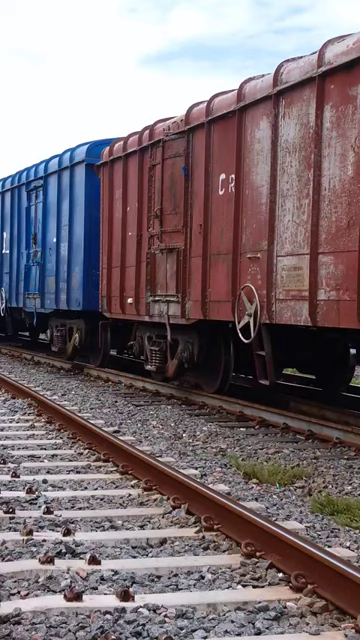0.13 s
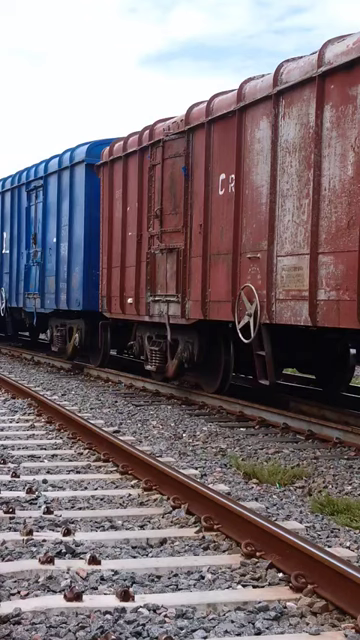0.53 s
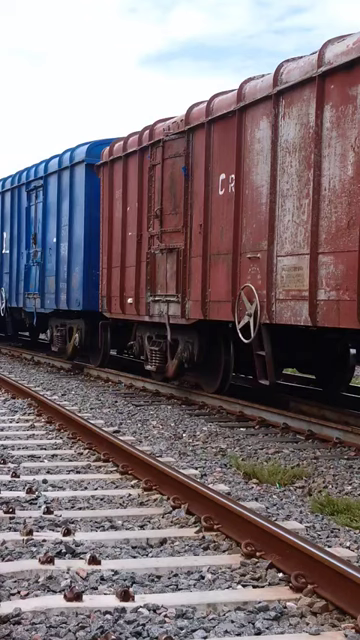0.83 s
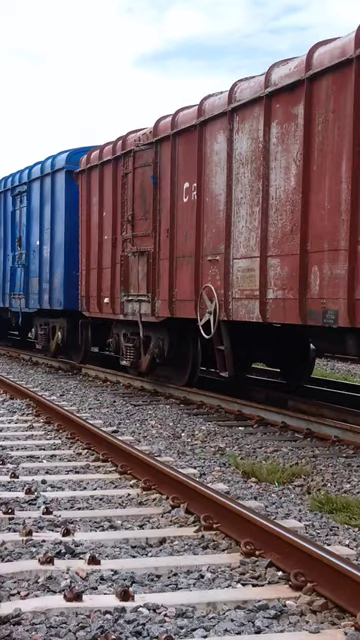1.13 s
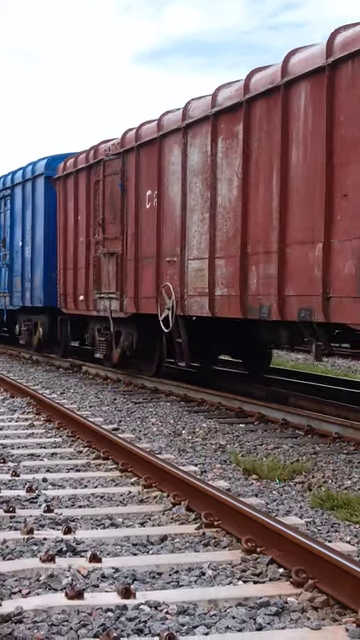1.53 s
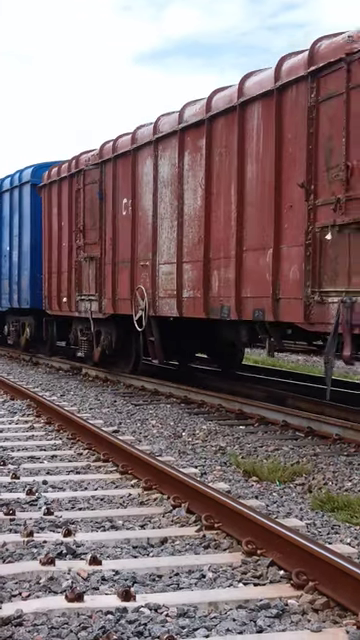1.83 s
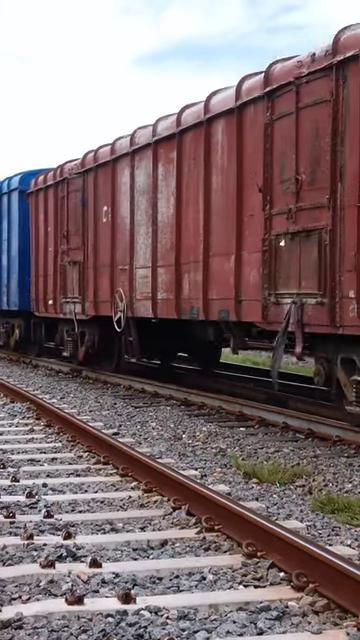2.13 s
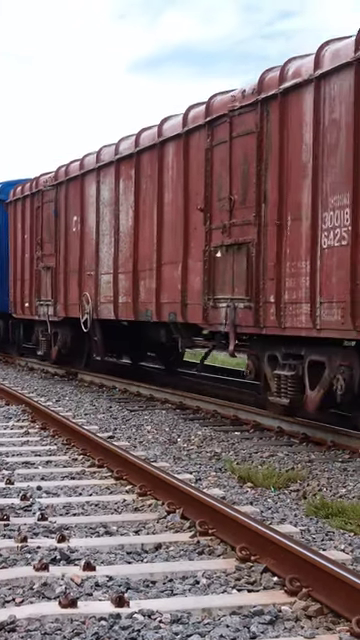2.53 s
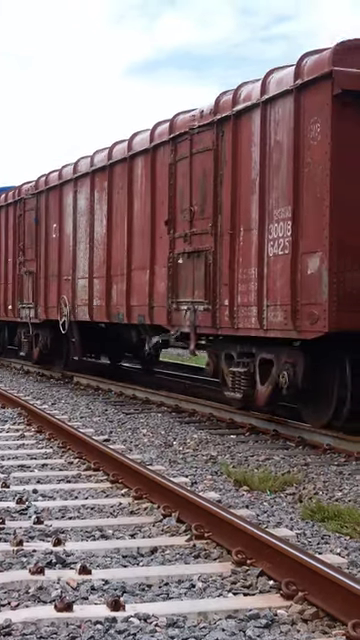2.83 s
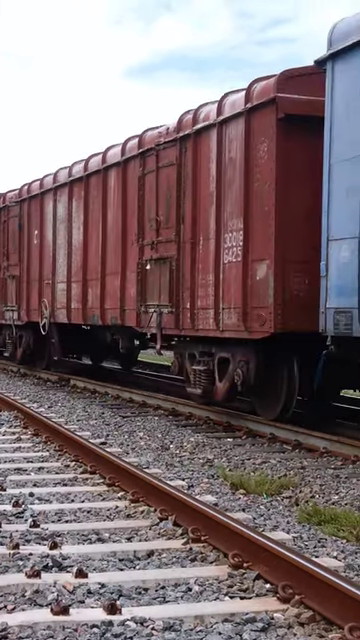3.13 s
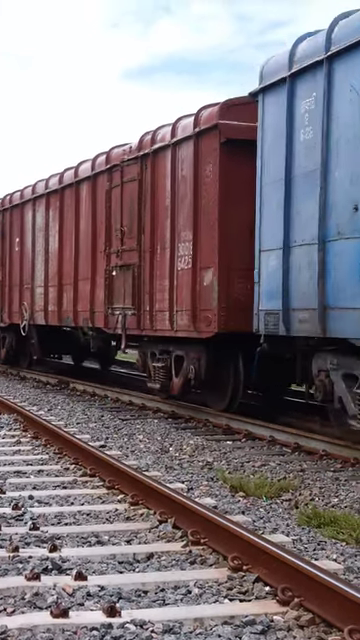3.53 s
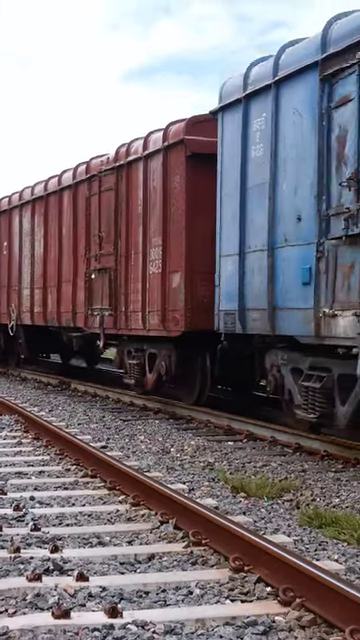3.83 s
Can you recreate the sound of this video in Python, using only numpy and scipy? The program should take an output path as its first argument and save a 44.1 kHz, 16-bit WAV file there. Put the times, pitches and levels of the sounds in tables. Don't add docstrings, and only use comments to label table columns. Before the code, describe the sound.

Slow goods wagons rumble by close at hand, clacking over rail joints, scraping and faintly squeaking

```python
import sys
import numpy as np
from scipy import signal
from scipy.fft import rfft, irfft
from scipy.io import wavfile
from scipy.ndimage import uniform_filter1d

SR = 44100
rng = np.random.default_rng(int(sys.argv[2]) if len(sys.argv) > 2 else 0)


def gain_from_db(level_db):
    decades = np.asarray(level_db, float) / 20
    return 10 ** decades


def inscribe(sig):
    pcm = np.round(np.clip(np.atleast_2d(sig).T, -1, 1) * 32767)
    wavfile.write(sys.argv[1], SR, pcm.astype(np.int16))


N = 176400

# time in seconds, rumble in dB, rail drone in dB, flange scrape in dB.
ROLL = [
    (0.32, -38.5, -46.5, -44),
    (0.68, -28, -38.5, -42),
    (1.85, -27.5, -35, -48),
    (2.21, -29, -37, -42),
    (2.52, -33.5, -38, -46.5),
    (2.89, -31, -38, -46.5),
    (3.44, -33.5, -33, -44.5),
    (4.0, -27, -33, -42),
]
# frequency in Hz, level in dB per Hz.
RUMBLE = [(13, -45), (22, -26), (36, -2), (59, 3.5), (200, -15), (249, -14), (480, -18.5), (620, -40),
          (1060, -120)]
DRONE = [(190, 1.5), (330, 2), (456, -1.5), (614, -7), (754, -3.5), (1010, -17), (1600, -22.5), (2080, -64),
         (3520, -120)]
SCRAPE = [(530, 2), (900, 1.5), (1190, -5), (2020, -9), (2290, -9), (3640, -13), (4370, -13), (5300, -16.5),
          (9000, -33), (11700, -63), (19800, -120)]
HISS = [(5410, -39), (9200, -4.5), (9640, 1), (10500, 1.5), (13500, -2), (15200, 4)]
# depth of slow patches in dB, depth of quick flicker in dB.
GRAIN_DB = [(1.0, 1.0), (1.5, 1.0), (1.8, .8), (2.5, 1.5), (1.0, .5), (2.0, 2.5)]
# frequency in Hz, width in Hz, level in dB.
WHEEL = [(1700, 160, -3), (2100, 40, -3), (2290, 70, -1), (2530, 90, -3), (3033, 50, -2), (4200, 200, -3),
         (4870, 60, -7), (5300, 200, -6)]
SLEEPER = [(120, 67, -16), (198, 90, 12.5), (278, 180, 14), (364, 97, -4.5), (497, 120, 5), (730, 26, -2),
           (874, 67, -30)]
# frequency in Hz, likeness from 0 to 1.
SAME = [(60, 0.88), (300, 1), (700, 0.86), (1400, 0.53), (3000, 0.047), (7000, 0.023), (14000, 0.078)]
# frequency in Hz, left minus right in dB.
TILT = [(60, 2.5), (300, 2), (1300, 2), (3000, 1.5), (8000, -1.5), (14000, -.5)]
# frequency in Hz, level in dB per Hz.
WIND = [(25, -52), (60, 17.5), (100, -1), (270, -9), (500, -18.5), (1000, -28)]
# middle in seconds, length in seconds, level in dB.
GUSTS = [
    (0.433, 0.032, -48),
    (0.705, 0.13, -23.5),
    (0.934, 0.059, -26.5),
    (1.25, 0.42, -37.5),
    (2.147, 0.083, -21.5),
    (2.702, 0.12, -27.5),
    (2.835, 0.15, -18),
    (2.898, 0.14, -24.5),
    (3.055, 0.083, -12),
    (3.142, 0.098, -28),
]
# time in seconds, peak in dB, pitch in Hz.
PUFFS = [
    (2.796, -8.5, 141),
    (2.821, -6, 93),
    (2.833, -12, 120),
    (2.851, -9, 130),
    (2.881, -14, 108),
    (2.955, -8, 114),
    (3.051, -16, 101),
    (3.071, -17, 120),
    (3.089, -13, 88),
    (3.125, -9.5, 108),
]
# middle in seconds, pitch in Hz, peak in dB.
BUMPS = [(0.238, 79, -38), (0.448, 62.3, -24.5), (0.53, 105, -28), (0.587, 125, -30), (0.589, 56.5, -20),
         (0.659, 103, -25.5), (0.713, 66, -23), (0.765, 134, -26), (0.832, 80, -36), (1.069, 61, -24.5),
         (1.13, 71, -26), (1.397, 84, -27), (1.482, 97, -23), (1.514, 108, -28), (1.54, 59.4, -22),
         (1.702, 136, -29), (1.884, 119, -24.5), (2.094, 52, -23), (2.133, 136, -41), (2.603, 68.6, -20),
         (2.754, 61, -24.5), (3.053, 136, -29), (3.409, 69.4, -20.5), (3.505, 56.4, -25.5),
         (3.651, 128, -24), (3.812, 47, -31)]
# middle in
# seconds, pitch in Hz, peak in dB.
KNOCKS = [(0.19, 530, -39), (0.283, 212, -34), (0.573, 504, -27), (0.586, 134, -34), (0.778, 178, -25),
          (0.94, 617, -26), (1.433, 673, -37), (1.441, 970, -35), (1.468, 630, -35), (1.478, 890, -39),
          (1.523, 520, -33), (1.525, 663, -28.1), (1.535, 255, -21.5), (1.56, 670, -34.8), (1.69, 740, -29),
          (2.119, 730, -28), (2.126, 159, -28.5), (2.19, 513, -32), (2.195, 780, -30), (2.821, 342, -23.5),
          (2.837, 466, -30), (2.85, 135, -36), (3.046, 698, -34.8), (3.071, 223, -17), (3.074, 940, -33),
          (3.622, 760, -25), (3.648, 138, -24), (3.651, 206, -23), (3.685, 670, -31), (3.803, 563, -26.5)]
# middle in seconds, pitch in Hz, peak in dB.
PINGS = [(1.6, 202, -26), (1.77, 422, -30), (2.114, 243, -23.5), (0.928, 2520, -43), (1.432, 3060, -47),
         (1.448, 2970, -53), (1.446, 4340, -36), (1.456, 1780, -36), (1.462, 2200, -33), (1.516, 2330, -32),
         (1.535, 1610, -36), (1.684, 2220, -40), (2.113, 1610, -41), (3.047, 1650, -34.5),
         (3.624, 2200, -41), (3.685, 2440, -37), (3.697, 2860, -45), (3.862, 2440, -32), (3.968, 2360, -37)]
# start in seconds, length in seconds, start pitch in Hz, end pitch in Hz, level in dB.
SQUEAKS = [
    (.25, .09, 700, 700, -43),
    (.33, .06, 700, 722, -42),
    (.375, .095, 703, 698, -38),
]
CREAK = (2.69, .11, 636, 636, -48)
SQUEAK_PARTS_DB = (-2, -5, 0, -24, -14)
CREAK_PARTS_DB = (-2, -1, -14, -12, -1, -5, -20, -12, -3)
CHIRPS = [
    (0.935, 0.07, 2390, 2330, -46),
    (1.095, 0.05, 2350, 2450, -45),
    (1.128, .06, 2450, 2170, -42),
    (1.17, .065, 2200, 2070, -46),
    (3.684, 0.065, 2920, 2860, -45),
    (2.115, 0.05, 2560, 2560, -46),
    (3.51, .11, 4060, 4000, -54),
    (3.5, 0.15, 5380, 5400, -55),
]
# time in seconds, clank in dB, thud in dB, length in seconds, loudest ring in Hz.
CLACKS = [(0.555, -23.5, -49, 0.045, 2300), (0.624, -27, -55, 0.014, 2320),
          (0.929, -26, -21.5, 0.066, 2530), (1.424, -23, -33, 0.059, 3070),
          (1.433, -32.5, -16.5, 0.1, 2760), (1.505, -31, -16, 0.04, 2230), (1.526, -37, -17.5, 0.18, 1630),
          (1.6756, -34, -25.5, 0.056, 2260), (1.997, -28.5, -25, 0.12, 2340),
          (2.109, -28, -16.5, 0.039, 1580), (2.183, -34, -17.5, 0.023, 2190),
          (2.704, -37.5, -25, 0.12, 2080), (3.039, -24.5, -18.5, 0.027, 1550),
          (3.069, -30, -22, 0.03, 1660), (3.088, -27.5, -37, 0.046, 1900), (3.239, -37, -23, 0.042, 1650),
          (3.622, -24.5, -17.5, 0.049, 2100), (3.682, -23, -26, 0.032, 3000),
          (3.8506, -26.5, -20, 0.047, 2470), (3.953, -26.5, -30, 0.04, 2250)]
# multiple of the ring pitch, level in dB per Hz.
CLANK = [(.25, 7), (.5, -3), (1.0, 1.5), (1.6, 0), (2.5, -19), (4.0, -33)]
# middle in seconds, length in seconds, level in dB.
GRINDS = [
    (2.05, 0.16, -45.5),
    (2.3, 0.61, -48.5),
    (3.45, 0.43, -51.5),
]
# frequency in Hz, width in Hz, level in dB.
GRIND = [(4150, 660, 2), (5320, 940, -0.5)]

OPEN_S = 0.1503
TRAIN_LAG_S, CLACK_LAG_S = 0.00037, 0.00013


def evened(x):
    return x / np.sqrt(np.mean(x ** 2) + 1e-20)


def read(points, hz):
    f, value = np.transpose(points)
    return np.interp(np.log(hz + 1), np.log(f + 1), value)


def resonate(x, hz, width):
    turn = np.exp(2j * np.pi * np.cumsum(hz * np.ones(len(x))) / SR)
    r = np.exp(-np.pi * width / SR)
    smooth = signal.lfilter([1 - r], [1, -r], x / turn + 1e-18)
    return 2 * (turn * smooth).real


def noise(shape, patchy_db, flicker_db, size):
    frames = 4 * N // size + 5
    hz = np.fft.rfftfreq(size, 1 / SR)
    a, b, c, d, patches = rng.standard_normal((frames, len(hz), 5)).T
    patches = uniform_filter1d(patches, size=size // 100, axis=0)
    patches = evened(uniform_filter1d(patches, size=8192 // size, axis=1))
    flicker = evened(uniform_filter1d(rng.standard_normal(frames), size=3))
    inside = (hz > shape[0][0] / 1.3) & (hz < shape[-1][0] * 1.02)
    colour = (read(shape, hz) - 80 * ~inside)[:, None]
    z = np.array([a + 1j * b, c + 1j * d]) * gain_from_db(colour + patchy_db * patches + flicker_db * flicker)
    return evened(signal.istft(z, nperseg=size, noverlap=size - size // 4)[1][:, :N])


def ring(modes, pair):
    hz = np.fft.rfftfreq(pair.shape[1], 1 / SR)
    power = 0
    for f, w, d in modes:
        near = 1 + (2 * (hz - f) / w) ** 2
        far = 1 + (2 * (hz - f) / (3 * w)) ** 2
        power = power + gain_from_db(2 * d) / w / near / far
    return evened(irfft(rfft(pair) * np.sqrt(power), pair.shape[1]))


def swells(rows):
    t = np.arange(N) / SR
    return sum(gain_from_db(db) * np.exp(-(2 * (t - s) / length) ** 2) for s, length, db in rows)


def bursts(rows, seconds):
    out, t = np.zeros(N + SR), np.arange(-4410, 4410) / SR
    for s, hz, db in rows:
        lead = 28 / hz ** 2
        bell = np.exp(-(2 * t / seconds(hz)) ** 2)
        start = round((s - lead) * SR) - 4410
        out[start:][:len(t)] += gain_from_db(db) * bell * np.cos(2 * np.pi * hz * (t - 2 * lead))
    return out[:N]


def ports(pair, lag_s):
    hz, (a, b) = np.fft.rfftfreq(N, 1 / SR), rfft(pair)
    same = np.clip(read(SAME, hz), 0, 1)
    left = (same * a + np.sqrt(1 - same ** 2) * b) * np.exp(-2j * np.pi * hz * lag_s)
    half_tilt = read(TILT, hz) / 2
    return irfft(np.array([left * gain_from_db(half_tilt), a * gain_from_db(-half_tilt)]), N)


def rolling():
    s, *levels = np.transpose(ROLL)
    t = np.arange(N) / SR
    rumble, drone, scrape = (np.interp(t, s, v) for v in levels)
    hiss = gain_from_db(-61.5 + 4.5 + 0.7 * (scrape - scrape.mean()))
    hiss = hiss * (1 - np.exp((OPEN_S - t) / 0.046))
    out = gain_from_db(rumble + 2.56) * noise(RUMBLE, *GRAIN_DB[0], size=2048)
    out += gain_from_db(drone + 2.0) * noise(DRONE, *GRAIN_DB[1], size=1024)
    out += gain_from_db(scrape + 7.5) * noise(SCRAPE, *GRAIN_DB[2], size=512)
    out += gain_from_db(scrape - 8) * ring(WHEEL, noise(SCRAPE, *GRAIN_DB[3], size=1024))
    return out + hiss * noise(HISS, *GRAIN_DB[4], size=512)


def wind():
    breeze = gain_from_db(-34.5) * np.clip(np.arange(N) / SR / 1.15, 0, 1)
    air = noise(WIND, *GRAIN_DB[5], size=1024)
    steady = air / np.sqrt(uniform_filter1d(air ** 2, size=3000, axis=1) + 0.05)
    puffs = bursts([(s, hz, db) for s, db, hz in PUFFS], lambda hz: 1.6 / hz)
    left = swells(GUSTS) * steady[0] + puffs + breeze * air[0]
    return np.array([left, 0.38 * breeze * air[1]])


def knocks(rows):
    one = gain_from_db(2) * bursts(rows, lambda hz: 0.17 / hz ** 0.37)
    return np.array([one, 0.5 * one])


def squeaks():
    out = np.zeros(N)
    families = [(SQUEAKS, SQUEAK_PARTS_DB), ([CREAK], CREAK_PARTS_DB), (CHIRPS, None)]
    for rows, parts_db in families:
        for s, length, hz0, hz1, db in rows:
            n = round(length * SR)
            hz, fuzz = np.linspace(hz0, hz1, n), rng.standard_normal(n)
            waver = 1 + 0.003 * evened(uniform_filter1d(fuzz, size=600))
            turns = np.cumsum(hz * waver) / SR
            if parts_db is None:
                breath = resonate(resonate(fuzz, hz, 60), hz, 180)
                tone = np.sin(2 * np.pi * turns) + 0.6 * evened(breath)
            else:
                tone = sum(gain_from_db(d) * np.sin(2 * np.pi * (k + 1) * turns) for k, d in enumerate(parts_db))
            out[round(s * SR):][:n] += gain_from_db(db) * np.sqrt(np.hanning(n)) * tone
    return np.array([np.roll(out, round(CLACK_LAG_S * SR)), out])


def blow(db, length):
    t = np.arange(SR // 4) / SR
    rise = np.minimum(t / 0.0029, 1)
    return gain_from_db(db) * rise * (np.exp(-(t / length) ** 2) + 0.4 * np.exp(-t / 0.008))


def clacks():
    ring_share, size = 0.36, SR // 4
    out, white = np.zeros((2, N + SR)), rng.standard_normal((2, N + SR))
    tunes = 1 + 0.06 * rng.standard_normal((len(CLACKS), 8))
    bins = np.fft.rfftfreq(size, 1 / SR)
    for (s, clank_db, thud_db, length, hz), tune in zip(CLACKS, tunes):
        at = slice(round(s * SR), round(s * SR) + size)
        wheel = ring(WHEEL + [(hz, 120, 5)], white[:, at])
        colour = gain_from_db(read([(k * hz, d) for k, d in CLANK], bins)) * (bins > 500)
        grit = evened(irfft(rfft(white[::-1, at]) * colour, size))
        out[:, at] += blow(clank_db - 8.5, length) * (ring_share * wheel + (1 - ring_share) * grit)
        timber = ring([(f * k, w, d) for (f, w, d), k in zip(SLEEPER, tune)], white[:, at])
        out[:, at] += blow(thud_db - 9.5, 0.99 * length) * timber
    return out[:, :N]


def grinding():
    return swells(GRINDS) * ring(GRIND, rng.standard_normal((2, N)))


def scene():
    train = ports(rolling() + grinding() + knocks(BUMPS + KNOCKS), TRAIN_LAG_S)
    strikes = ports(clacks() + knocks(PINGS), CLACK_LAG_S)
    return train + strikes + squeaks() + wind()


def low_pass(x):
    return signal.sosfilt(signal.butter(12, 15360, fs=SR, output="sos"), x)


def record(dry):
    t = np.maximum(np.arange(N) / SR - OPEN_S, 0)
    click = -np.exp(-t / 0.00072) * (1 - np.exp(-t / 0.00005))
    thump = click + 0.32 * np.exp(-t / 0.016) * np.sin(2 * np.pi * 77 * t)
    thump_level = gain_from_db([-14, -68])[:, None]
    notch_hz, notch_width_hz, low_cut_hz, edge_hz = 8950, 450, 37.3, 15330
    b, a = signal.iirnotch(notch_hz, notch_hz / notch_width_hz, SR)
    x = signal.lfilter(b, a, dry)
    x = signal.sosfilt(signal.butter(6, low_cut_hz, "high", fs=SR, output="sos"), x)
    x = x * (1 - np.exp(-t / 0.068)) + thump_level * thump * (t > 0)
    treble_cut = signal.firwin(401, edge_hz, window=("kaiser", 9), fs=SR)
    mix = signal.oaconvolve(x, treble_cut[None], "same")
    return low_pass(mix)


dry = scene()
out = record(dry)
inscribe(out)
```